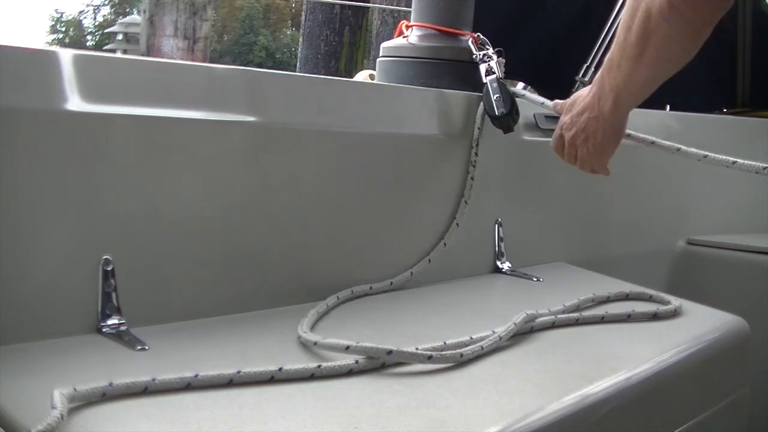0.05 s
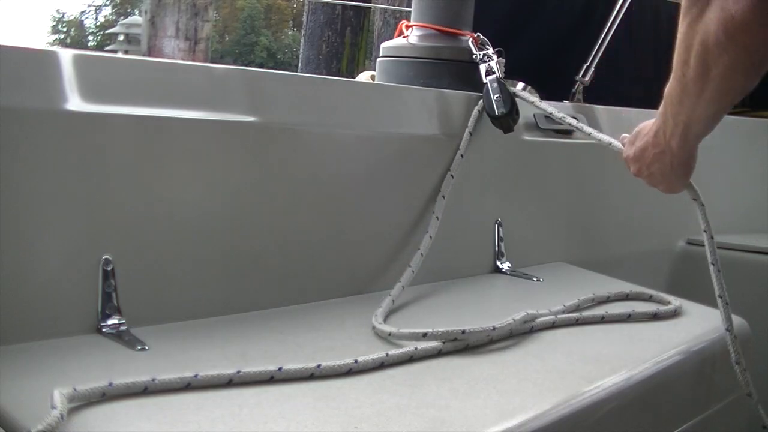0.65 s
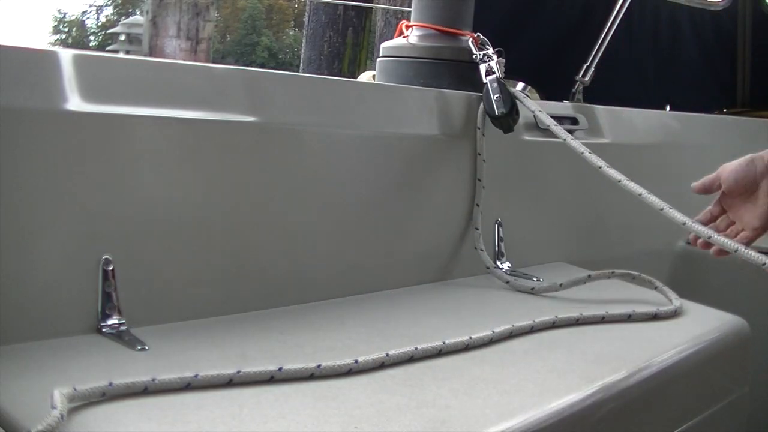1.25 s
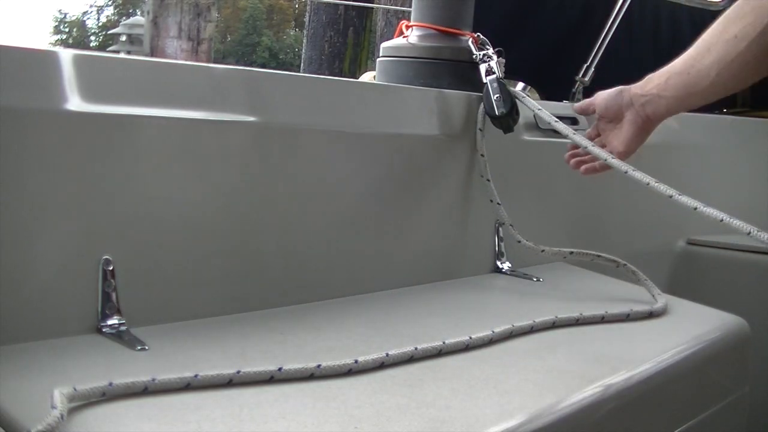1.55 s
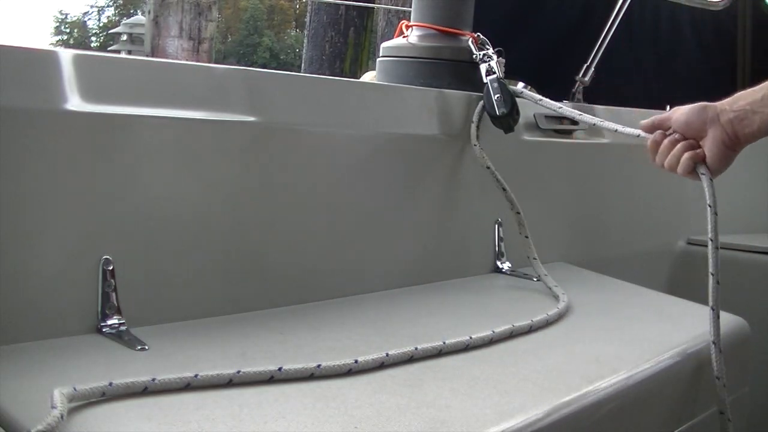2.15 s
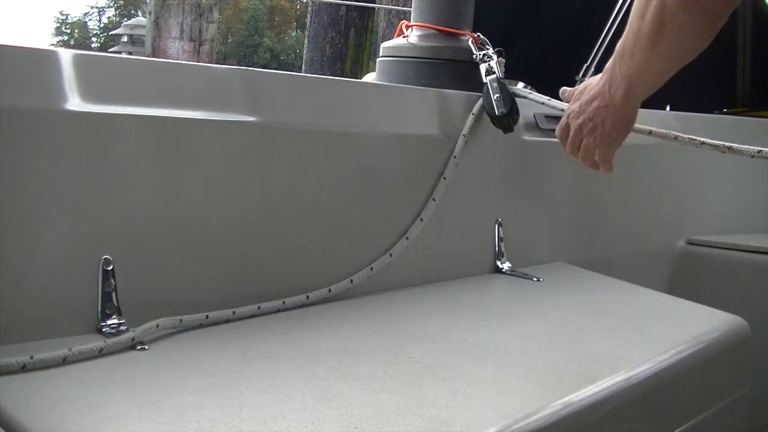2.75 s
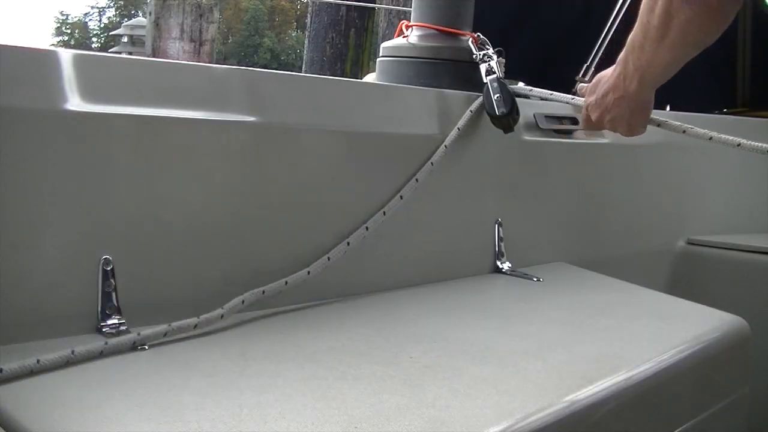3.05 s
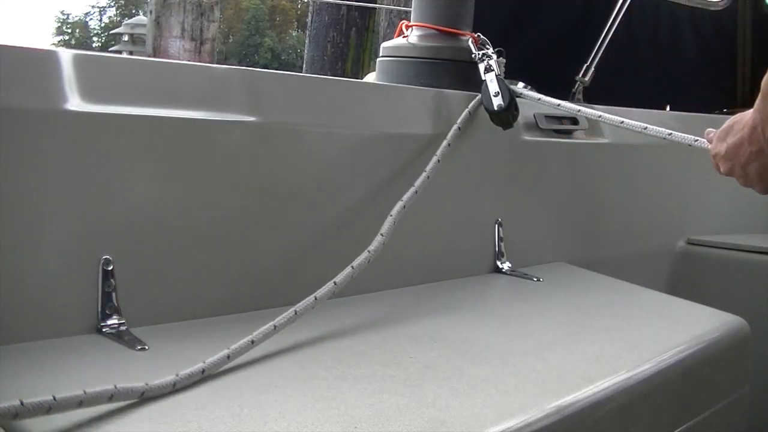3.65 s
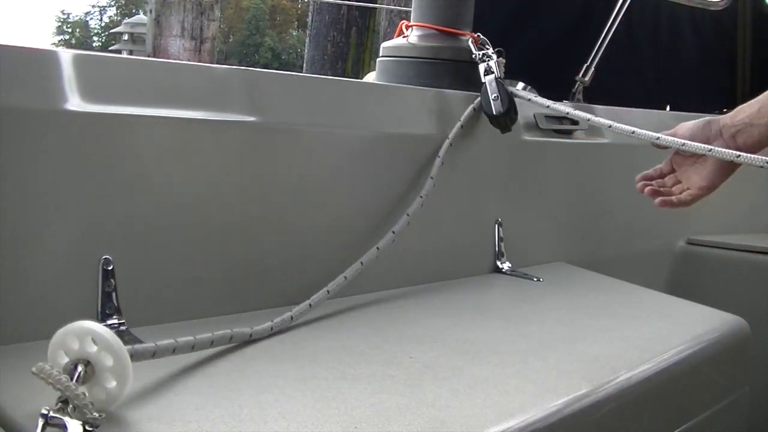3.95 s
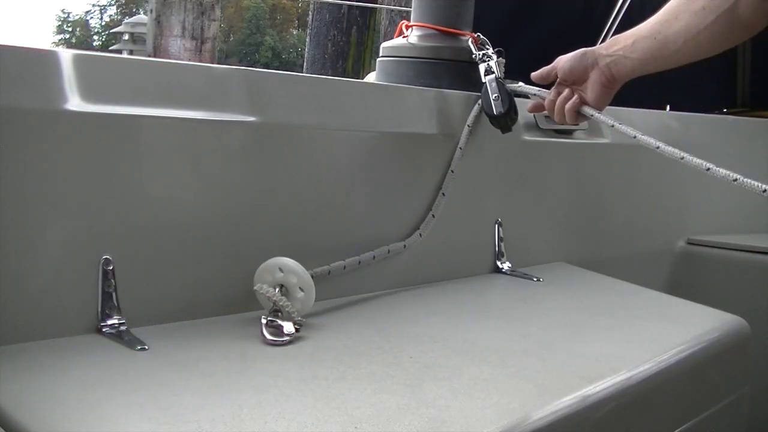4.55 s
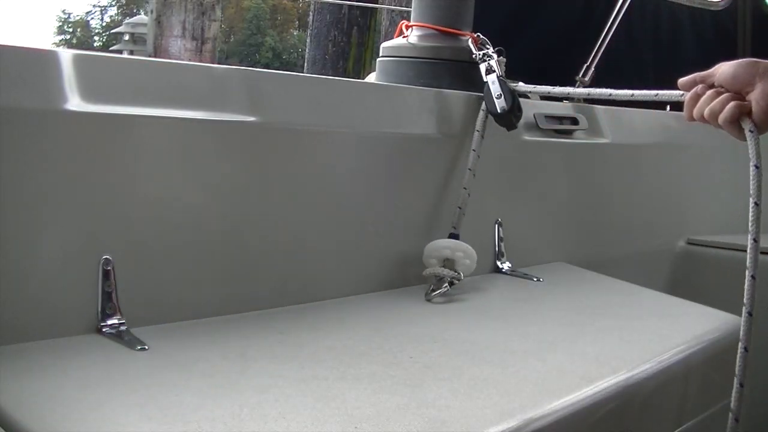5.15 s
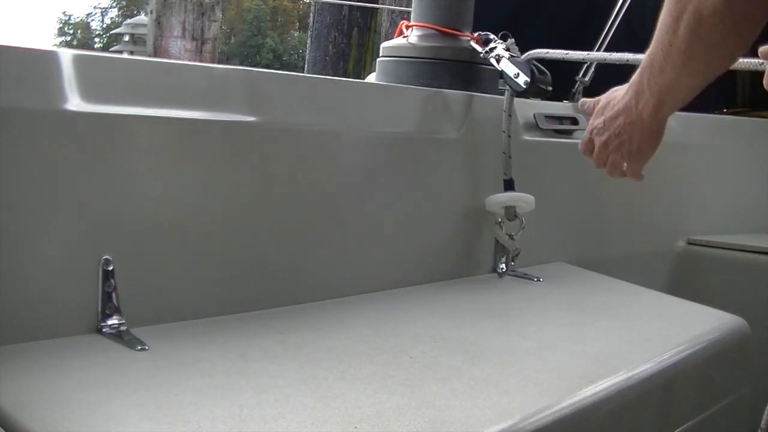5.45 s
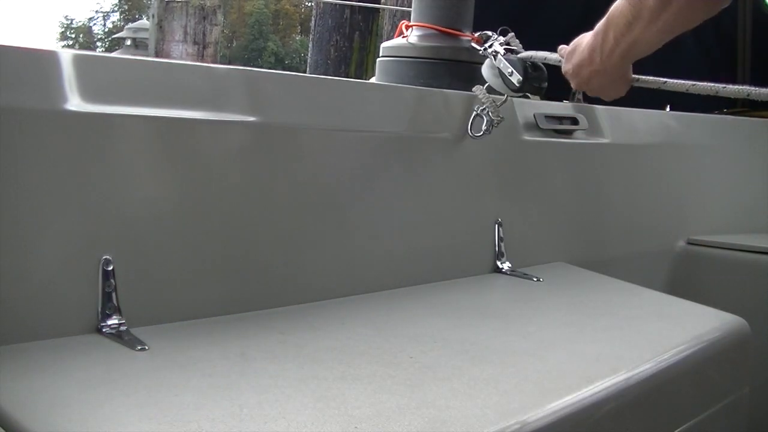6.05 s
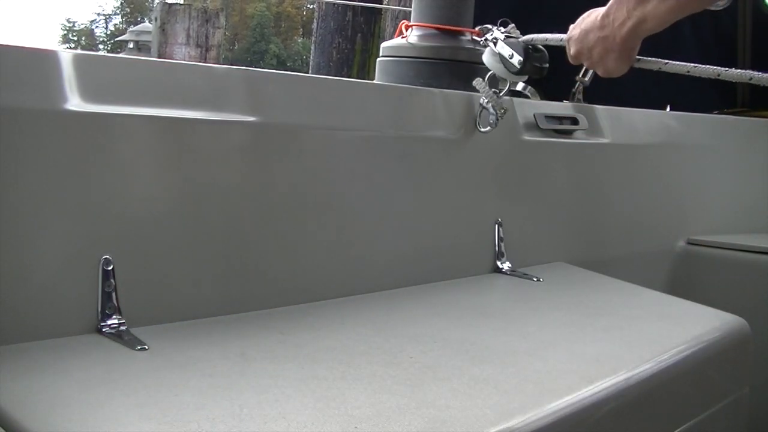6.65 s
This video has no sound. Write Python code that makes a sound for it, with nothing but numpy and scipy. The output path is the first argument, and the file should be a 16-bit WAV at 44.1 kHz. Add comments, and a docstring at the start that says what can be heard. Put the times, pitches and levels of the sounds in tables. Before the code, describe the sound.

Rope is hauled softly through a pulley, then its end fittings scrape and clatter over a hollow seat and clack against the block.

```python
"""Rope hauled through a block

A braided rope runs hand over hand through a block in a sailing boat's cockpit, hissing over the sheave.
The plastic stopper disc and steel shackle on its end drag and chatter across the hollow seat, lift off
and knock against the block four times. The walls give a short, dense echo; wind and water murmur."""
import sys
import numpy as np
from scipy import signal
from scipy.fft import rfft, irfft, next_fast_len
from scipy.io import wavfile
from scipy.ndimage import uniform_filter1d, minimum_filter1d

SR = 44100
rng = np.random.default_rng(int(sys.argv[2]) if len(sys.argv) > 2 else 0)


def file_out(sig):
    """Save sig as 16-bit WAV at sys.argv[1]."""
    # one column per channel
    cols = np.atleast_2d(sig).T
    # limit, then scale
    lim = np.clip(cols, -1, 1)
    pcm = np.round(lim * 32767).astype(np.int16)
    wavfile.write(sys.argv[1], SR, pcm)


N = 299962
T = np.arange(N) / SR
HZ = np.fft.rfftfreq(16384, 1 / SR)

# Hard knocks of the fittings. Each row: start in seconds, level, bass and treble in dB, pitch factor,
# rattle level and rattle treble in dB, rattle length in seconds, crack peak in dB.
KNOCKS = [(3.433, -14.5, 16, 8, 1.1, -12, 12, 0.0098, -30),
          (3.9395, -0.5, 20.5, 17, 0.92, -4.5, -2, 0.0047, -15),
          (4.0506, 2.5, -38, 10, 1.02, -0.5, -8, 0.0064, -12),
          (5.5355, -9, 3.5, -15, 0.96, 0, -34, 0.004, -40), (5.8757, 1, 15, 19, 1.05, 1.5, 18, 0.063, -2),
          (6.0448, -17, -3, 22, 1.3, 7.5, 9, 0.035, -28), (6.0737, 0.5, -5, 7, 0.98, -1, 9, 0.0059, -14),
          (6.4486, -1, -7, 2.5, 0.98, -4, 3, 0.0042, -21.5),
          (6.7364, 1.5, -10, 3.5, 1, -8, 3, 0.017, -15.5)]


def rope():
    """Fibres brush the sheave and whirr with each pull; on a snatch the weave runs fast enough to sing."""
    haul = [(0, -48), (.25, -48), (.56, -47), (2.15, -45.5), (2.8, -43), (3.2, -43), (4.6, -40.5),
            (4.78, -48), (5.1, -32.5), (5.62, -47), (5.8, -43.5), (6.02, -47), (6.18, -44), (6.43, -47.5),
            (6.7, -51)]  # Each row: time in seconds, hiss level in dB.
    braid_spectrum = [(410, -72), (700, -22), (852, -8.5), (1120, -13), (1400, -11.5), (1560, -11),
                      (2490, -4), (3790, -2.5), (4100, -3), (5260, 0.5), (9990, -29.5), (15000, -50)]  # Each row: frequency in Hz, level in dB.
    sheave_modes = [(4140, 61, -26), (4150, 88, -20), (5970, 110, -21)]  # Each row: frequency and width in Hz, dB against the hiss.
    # Each row: start, end, rise and fall in seconds, whirr pitch in Hz, level in dB.
    pulls = [(.42, 1.2, 0.14, 0.19, 5770, -50), (1.29, 2.0, 0.1, 0.24, 5200, -49.5),
             (2.12, 2.55, .14, 0.14, 5500, -50), (5.678, 5.862, 0.12, 0.067, 1950, -42)]
    # One table a snatch. Each row: time in seconds, pitch in Hz, level in dB.
    snatches = [
        [(5.32, 7500, -58), (5.385, 6540, -36.5), (5.42, 6400, -44)],
        [(6.48, 6200, -42), (6.54, 6500, -46), (6.567, 6000, -40.5), (6.595, 5200, -61)],
    ]
    hiss = through(grains(per_s=14000, spread_db=3.5), body(read(braid_spectrum)))
    hiss = hiss + sum(amp(db) * resonate(hiss, hz, width) for hz, width, db in sheave_modes)
    out = hiss * amp(np.interp(T, *np.transpose(haul)) + 0.58 * wander(per_s=30))
    drift = 1 + 0.058 * wander(per_s=8.2)
    for *span, hz, db in pulls:
        out += amp(db) * stroke(*span) * whistle(hz * drift, width_hz=1500)
    for snatch in snatches:
        times, hz, db = np.transpose(snatch)
        pitch_hz = np.interp(T, times, hz)
        gain = amp(np.interp(T, times, db)) * (T >= times[0]) * (T <= times[-1])
        tone = whistle(pitch_hz, width_hz=1400)
        overtone = amp(-15.5) * whistle(1.7 * pitch_hz, width_hz=1400)
        out += gain * (tone + overtone)
    return out


def sheave():
    """The spinning sheave rubs its cheek once a turn with a thin, rough chirp."""
    spins = [(0.618, 1.29, -54), (2.754, 3.1, -51.5)]  # Each row: start and end in seconds, peak in dB.
    chirp_hz, turn_s = 7660, 0.1
    t = T[:SR // 30]
    jitter = 0.13 * np.cumsum(rng.standard_normal(len(t)))
    chirp = np.hanning(len(t)) * np.sin(2 * np.pi * chirp_hz * t + jitter)
    return struck([(s, db) for start, end, db in spins for s in np.arange(start, end, turn_s)], chirp)


def knocks():
    """A sharp blow, then a brief rattle while the parts settle; each contact has its own colour."""
    block_spectrum = [(40, -70), (90, -49), (160, -22.5), (300, -15.5), (800, -8.5), (1300, -7), (2100, 1),
                      (2900, 0.5), (4000, -3), (6000, -9), (7500, -25.5), (11000, -46), (16000, -46)]  # Each row: frequency in Hz, level in dB.
    block_modes = [(1950, 400, 1.5), (2770, 400, 2.5)]  # Each row: frequency and width in Hz, lift in dB.
    dulling = [(8000, 0), (11000, -4), (15000, -10)]  # Softer later contacts. Each row: frequency in Hz, gain in dB.
    out, t = np.zeros(N), T[:len(HZ)]
    bass = 1 / (1 + (HZ / 900) ** 2)
    treble = 1 / (1 + (5500 / (HZ + 1)) ** 3)
    # Bending waves carry treble faster than bass, which smears the blow.
    delay_s = 0.002456 / np.sqrt(1 + HZ / 500)
    blow = irfft(np.exp(-2j * np.pi * np.cumsum(delay_s) * HZ[1]))[:len(t)]
    for start, db, bass_db, treble_db, pitch, rattle_db, rattle_treble_db, rattle_s, _ in KNOCKS:
        colour_db = read(block_spectrum, HZ / pitch) + lifts(block_modes) + bass_db * bass
        hard = body(colour_db + treble_db * treble)
        soft = body(colour_db + rattle_treble_db * treble + read(dulling))
        rattle = unit_energy(rng.standard_normal(len(t)) * np.exp(-(t / rattle_s) ** 2))
        knock = signal.fftconvolve(blow, hard) + amp(rattle_db) * signal.fftconvolve(rattle, soft)
        add(out, start, amp(db) * knock / abs(hard).max())
    return out


def cracks():
    """The thin snap of first contact that opens each knock."""
    spectrum = [(2000, -26), (4000, 14), (5500, 3), (7000, 11), (9000, 6), (13000, -4), (16000, 0)]  # Each row: frequency in Hz, level in dB.
    delay_s, length_s = 0.0004, 0.0016
    t = T[:round(length_s * SR)]
    burst = rng.choice([-1., 1.], len(t)) * np.sin(np.pi * t / length_s)
    crack = signal.fftconvolve(burst, body(read(spectrum)))
    return struck([(start + delay_s, db) for start, *_, db in KNOCKS], crack)


def cheek_clacks():
    """The stopper strikes the block's steel cheek, which rings."""
    clacks = [(6.0452, -11), (6.1838, -27)]  # Each row: start in seconds, peak in dB.
    modes = [(487, -2.5, 0.032), (1280, -2, 0.061), (2420, -7, 0.092), (2690, -4, 0.11), (2700, 4, 0.14),
             (3230, 5, 0.1), (3330, -3, 0.076), (3410, 5, 0.09), (3920, -6, .05), (4960, -2, .05),
             (7450, 2, 0.05), (7860, -12, 0.044)]  # Each row: frequency in Hz, level in dB, t60 in seconds.
    return struck(clacks, ringing(modes))


def scrape_controls():
    """The disc's speed sets the gains of boom, clatter, rasp and grit, and the rim's pitch in Hz."""
    # Each row: start, end, rise and fall in seconds, then at full speed: boom, clatter, rasp and grit
    # in dB, rim pitch in Hz.
    scrapes = [(3.233, 3.891, 0.34, 0.15, -26.5, -28.5, -28, -34, 2130),
               (3.625, 4.046, 0.2, 0.021, -41.5, -34.5, -25, -32.5, 2270),
               (3.98, 4.824, 0.14, 0.24, -30, -31, -20, -31.5, 2430),
               (4.77, 5.091, 0.023, 0.018, -30.5, -34.5, -36.5, -64, 2020),
               (4.873, 5.304, 0.21, 0.069, -35, -33, -17, -33.5, 2750),
               (5.192, 5.506, 0.073, 0.15, -31.5, -29, -19, -35.5, 2170),
               (5.385, 5.556, 0.094, 0.055, -29.5, -23.5, -24, -32.5, 2130)]
    speed_powers = 0.67, 0.96, 1.74, 1.74  # boom, clatter, rasp, grit
    slow_pitch_share = 0.66
    rows = np.array(scrapes)
    speed = np.array([stroke(*row[:4]) for row in rows])
    gains = [amp(db[:, None]) * speed ** power for db, power in zip(rows[:, 4:8].T, speed_powers)]
    pitches_hz = rows[:, 8:] * (slow_pitch_share + (1 - slow_pitch_share) * speed)
    rasp_power = gains[2] ** 2
    pitch_hz = np.average(pitches_hz, axis=0, weights=rasp_power + 1e-12)
    return np.linalg.norm(gains, axis=1), pitch_hz


def drag():
    """The disc bumps over non-slip grain: the same impacts drum the seat, rasp the rim and crackle."""
    # Bare rope on the seat. Each row: start, end, rise and fall in seconds, level in dB.
    slides = [(2.636, 2.922, 0.015, 0.045, -54.5), (2.883, 3.077, 0.01, 0.13, -45.5),
              (3.077, 3.234, 0.023, 0.13, -48)]
    clatter_spectrum = [(60, -57), (250, -22.5), (430, 14), (540, 10.5), (800, 9), (1100, 2.5), (1400, 2.5),
                        (2200, -40.5)]  # Each row: frequency in Hz, level in dB.
    grit_spectrum = [(2500, -19.5), (4300, 4.5), (5200, 13.5), (6300, 8), (7500, -4.5), (9500, -7.5),
                     (11000, -13), (14000, -18), (16000, -81)]  # Each row: frequency in Hz, level in dB.
    (boom_gain, clatter_gain, rasp_gain, grit_gain), pitch_hz = scrape_controls()
    slide_gain = sum(amp(db) * stroke(*span) for *span, db in slides)
    bumps = grains(per_s=7000, spread_db=1)
    bumps = unit_rms(bumps * amp(0.9 * wander(per_s=120)))  # uneven pressure
    boom = (boom_gain + slide_gain) * seat_boom(bumps)
    clatter = clatter_gain * through(bumps, body(read(clatter_spectrum)))
    rasp = rasp_gain * rim_rasp(bumps, pitch_hz)
    grit = grit_gain * through(bumps, body(read(grit_spectrum)))
    return boom + clatter + rasp + grit


def seat_boom(bumps):
    """The hollow seat's modes trade strength as the disc travels inward from the free edge."""
    spectrum = [(40, -66), (70, -35), (100, -4), (130, -9.5), (170, -2), (260, 1.5), (350, -4), (480, 9.5),
                (900, -12.5), (2000, -72)]  # Each row: frequency in Hz, level in dB.
    modes = [(107, 14, -5, 6), (167, 14, 4, 2), (202, 24, 2, 2), (245, 45, -3, 4), (281, 22, 11, 4),
             (337, 22, 11, 10), (405, 40, -5, 0), (508, 30, 8, -3), (615, 22, -2, 4), (810, 90, 10, 8),
             (955, 45, 9, 5)]  # Each row: frequency and width in Hz, edge and mid-seat weights in dB.
    edge_nearness = [(3.8, 0.96), (4.0, 0.08)]  # Each row: time in seconds, nearness from 0 to 1.
    near = np.interp(T, *np.transpose(edge_nearness))
    panel = sum(amp(near * edge_db + (1.5 - near) * mid_db) * resonate(bumps, hz, width)
                for hz, width, edge_db, mid_db in modes)
    wash = through(bumps, body(read(spectrum)))
    return amp(-3) * unit_rms(tinted(panel, spectrum)) + amp(-4) * wash


def rim_rasp(bumps, pitch_hz):
    """The rim's hollow ring drifts as the disc turns onto another contact point."""
    spectrum = [(100, -71), (600, -25), (1150, -8), (1450, -3.5), (2000, -1.5), (2700, -1), (3500, -2.5),
                (4500, -6.5), (6000, -8), (8000, -59)]  # Each row: frequency in Hz, level in dB.
    modes = [(1410, 70, 4), (1870, 90, 3), (2450, 150, 2), (2780, 260, 2.5)]  # Each row: frequency and width in Hz, lift in dB.
    rim_rings = [(0.562, 60, -46), (.86, 169, 4.5), (1, 220, 10.5), (1.14, 190, -2)]  # Each row: multiple of the pitch, width in Hz, level in dB.
    disc = through(bumps, body(read(spectrum) + lifts(modes)))
    rings = sum(amp(db) * resonate(disc, pitch_hz * (ratio + 0.081 * wander(per_s=10)), width)
                for ratio, width, db in rim_rings)
    return unit_rms(resonate(disc, pitch_hz, width_hz=2200) + amp(-4) * unit_rms(rings))


def disc_skips():
    """Stick and slip: the rim snaps free with clicks that ring the disc briefly."""
    skips = [(3.5435, -7), (3.6246, -13), (3.6461, -12), (3.6558, -10), (3.7021, -7), (3.7164, -8),
             (3.7332, -3), (3.7449, -6), (3.757, -10), (3.7685, -10), (3.7748, -7), (3.7843, -5),
             (3.7949, -3), (3.8071, -4), (3.8173, -7), (3.8288, -6), (3.8458, -3), (3.8602, -4),
             (3.8722, -4), (3.8817, -3), (3.9043, -8), (3.9642, -9), (4.0107, -5), (4.1059, -8),
             (4.4542, -8), (4.5, -6), (4.5327, -8), (4.6598, -12), (4.8971, -10), (5.1489, -6),
             (5.1912, -5), (5.3578, -7)]  # Each row: start in seconds, peak in dB.
    spectrum = [(200, -27), (1100, -16), (1800, 16.5), (3000, 14), (4500, 5.5), (6500, -8.5), (9000, -11),
                (16000, -57)]  # Each row: frequency in Hz, level in dB.
    modes = [(1720, 72, 0.5), (2800, 490, 2)]  # Each row: frequency and width in Hz, lift in dB.
    return struck(skips, body(read(spectrum) + lifts(modes)))


def disc_sings():
    """Rubbing wakes one mode of the disc, then another, as it tilts."""
    sings = [(3.795, 3.98, 1780, -28), (3.67, 3.816, 2580, -26), (4.1, 4.198, 2260, -15),
             (4.25, 4.413, 2790, -24.5), (4.276, 4.477, 1420, -31.5), (4.83, 4.95, 1980, -28.5),
             (5.247, 5.354, 2530, -21)]  # Each row: start and end in seconds, pitch in Hz, level in dB.
    fade_s = 0.057
    return sum(amp(db) * stroke(start, end, fade_s, fade_s) * whistle(hz, width_hz=260)
               for start, end, hz, db in sings)


def shackle():
    """Steel pin and bow tick together; which mode rings most changes as the shackle tumbles."""
    modes = [(6240, -7, .12), (8830, -10, .05), (9140, 1, .13), (9260, -4, .09), (9490, -11, .05),
             (12450, -5, .18), (14120, -12, .1)]  # Each row: frequency in Hz, level in dB, t60 in seconds.
    tick_spectrum = [(3000, -7), (6500, 10.5), (9200, -1.5), (11000, 1), (14000, -21), (16000, -19)]  # Each row: frequency in Hz, level in dB.
    # Each row: start, end, rise and fall in seconds, relative level in dB, outer-mode offset in dB.
    jingles = [(3.29, 3.452, 0.031, .03, -39.5, -8), (3.427, 3.543, 0.023, 0.04, -30.5, -3),
               (3.515, 3.66, 0.031, 0.093, -24.5, 9), (3.596, 3.95, 0.071, 0.11, -28, -1),
               (3.89, 4.257, 0.059, 0.047, -31, 1), (4.21, 4.504, .05, 0.047, -36, 3),
               (4.444, 4.758, .05, 0.06, -39.5, -2)]
    # Single blows. Each row: start in seconds, peak in dB, share of t60, outer-mode offset in dB.
    chinks = [(3.325, -34, 0.23, -14), (3.358, -29, 0.2, -2), (3.433, -22, 0.7, -5),
              (3.474, -20.5, 0.61, -4), (3.531, -19.5, 0.44, 7), (3.696, -19, 1, -7),
              (3.744, -20, 0.7, -16), (4.051, -18, 0.21, -13), (4.16, -36, .5, -12), (4.392, -25, 0.44, -6),
              (5.537, -19.5, 0.59, -34)]
    main_hz, flicker_db, lying_t60_share = 9200, 7, 0.16  # lying on the seat damps the ring
    outer = [abs(hz - main_hz) > 500 for hz, _, _ in modes]
    main_gain = sum(amp(db) * stroke(*span) for *span, db, _ in jingles)
    outer_gain = sum(amp(db + outer_db) * stroke(*span) for *span, db, outer_db in jingles)
    ticks = grains(per_s=380, spread_db=2.6) * amp(4 * wander(per_s=60))
    out = amp(-7) * through(ticks * main_gain, body(read(tick_spectrum)))
    for (hz, db, t60), is_outer in zip(modes, outer):
        ring = unit_energy(ringing([(hz, db, t60 * lying_t60_share)]))
        contact = amp(db + flicker_db * np.tanh(wander(per_s=32)))
        out += amp(-19) * through(ticks * contact * (outer_gain if is_outer else main_gain), ring)
    for start, peak_db, share, outer_db in chinks:
        chink_modes = [(hz, db + outer_db * is_outer, t60 * share)
                       for (hz, db, t60), is_outer in zip(modes, outer)]
        add(out, start, amp(peak_db) * ringing(chink_modes))
    return out


def taps():
    """Slack rope slaps the seat and gear shifts: soft, smeared contacts."""
    contacts = [(0.846, -34, 220, 0.39), (.856, -31, 2500, 1.1), (0.947, -27.5, 3730, 0.27),
                (1.3033, -38, 1410, 0.085), (1.966, -35, 2940, 0.46), (2.457, -36.5, 255, 0.36),
                (2.9001, -26.5, 287, 0.42), (2.936, -32.5, 378, 0.77), (3.24, -31.5, 268, 0.48),
                (4.062, -14.5, 4800, 0.035), (4.08, -18, 2640, .04), (4.1, -13.5, 4200, 0.16),
                (4.8969, -14, 2030, 0.24)]  # Each row: start in seconds, peak in dB, centre in Hz, spread in octaves.
    out, t = np.zeros(N), T[:len(HZ)]
    treble_loss_db = HZ / 700  # soft contact
    bass_loss_db = 20 * np.log10(1 + (85 / (HZ + 10)) ** 2)  # panels radiate little deep bass
    for start, db, hz, octaves in contacts:
        band_db = -8 * np.log1p((np.log2((HZ + 1) / hz) / octaves) ** 2)
        force = rng.standard_normal(len(t)) * np.exp(-t / 0.0083)
        tap = signal.fftconvolve(force, body(band_db - treble_loss_db - bass_loss_db))
        add(out, start, amp(db) * tap / abs(tap).max())
    return out


def cockpit():
    """Impulse response of the close fibreglass walls; each band dies at its own rate."""
    decay = [(100, 0.56), (500, 0.2), (2500, 0.15), (6000, 0.13), (14000, 0.25)]  # Each row: frequency in Hz, t60 in seconds.
    size, per_s, first_s = SR // 3, 14000, 0.0012
    reflections = rng.choice([-1., 1.], size) * (rng.random(size) < per_s / SR) * (T[:size] > first_s)
    hz, t, bands = signal.stft(reflections, SR, nperseg=128)
    _, tail = signal.istft(bands * amp(-60 * t / read(decay, hz)[:, None]), SR, nperseg=128)
    return unit_energy(tail)


def shifting_echo(x, count=5, shift_s=0.22):
    """The gear moves, so one pattern of reflections fades into the next."""
    out = np.zeros(N)
    for k in range(count):
        away = (T / shift_s - k + count / 2) % count - count / 2
        out += through(x * np.cos(np.pi / 2 * np.clip(away, -1, 1)), cockpit())
    return out


def air():
    """Distant murmur of wind and water, gently swelling."""
    spectrum = [(20, -60), (55, -12.5), (110, -5.5), (200, 2.5), (320, 2), (520, -7), (1000, -17),
                (2500, -12), (5500, -19.5), (8000, -20), (14000, -29), (16000, -42)]  # Each row: frequency in Hz, level in dB.
    gain = amp(-53 + 0.6 * wander(per_s=6))
    return gain * through(rng.standard_normal(N), body(read(spectrum)))


def amp(db):
    """Decibels to gain."""
    return 10 ** (np.asarray(db) / 20)


def unit_rms(x):
    """Scales to rms 1."""
    return x / np.sqrt(np.mean(x ** 2) + 1e-20)


def unit_energy(x):
    """Scales to energy 1."""
    return x / np.linalg.norm(x)


def read(points, hz=HZ):
    """Interpolates on a log-frequency axis."""
    knots_hz, values = np.transpose(points)
    return np.interp(np.log(hz + 1), np.log(knots_hz + 1), values)


def lifts(modes):
    """Resonances as bumps on a dB spectrum."""
    return sum(db / (1 + (2 * (HZ - hz) / width) ** 2) for hz, width, db in modes)


def body(db):
    """Minimum-phase impulse response with this dB spectrum, energy 1."""
    log_gain = np.log(amp(np.maximum(db, db.max() - 90)))
    mirrored = np.concatenate([log_gain, log_gain[-2:0:-1]])
    spectrum = np.exp(signal.hilbert(mirrored).conj())
    return unit_energy(np.fft.ifft(spectrum).real[:len(HZ)])


def through(x, response):
    """Plays a force into a body."""
    return signal.oaconvolve(x, response)[:N]


def tinted(x, db_points):
    """Applies a smooth dB spectrum."""
    size = next_fast_len(N + 2048, True)
    gain = amp(read(db_points, np.fft.rfftfreq(size, 1 / SR)))
    return irfft(rfft(x, size) * gain, size)[:N]


def add(mix, start_s, sound):
    """Adds a sound in place."""
    part = mix[round(start_s * SR):][:len(sound)]
    part += sound[:len(part)]


def struck(rows, sound):
    """One sound at each (start in seconds, peak in dB)."""
    out = np.zeros(N)
    for start, db in rows:
        add(out, start, amp(db) * sound / abs(sound).max())
    return out


def stroke(start_s, end_s, rise_s, fall_s):
    """Speed of one movement, 0-1: it rises, holds and falls."""
    return np.clip(np.minimum((T - start_s) / rise_s, (end_s - T) / fall_s), 0, 1)


def wander(per_s):
    """Smooth random curve, rms 1."""
    knots = rng.standard_normal(N // 20)
    return unit_rms(np.interp(T * per_s, np.arange(len(knots)), knots))


def grains(per_s, spread_db):
    """Random tiny impacts of uneven size, rms 1."""
    size = amp(spread_db * np.minimum(rng.exponential(1, N), 4)) * rng.choice([-1, 1], N)
    return unit_rms(size * (rng.random(N) < per_s / SR))


def resonate(x, hz, width_hz):
    """A resonance at hz (number or curve), rms 1."""
    carrier = np.exp(2j * np.pi * np.cumsum(np.full(N, hz)) / SR)
    pole = np.exp(-np.pi * width_hz / SR)
    return unit_rms((carrier * signal.lfilter([1 - pole], [1, -pole], x / carrier)).real)


def whistle(hz, width_hz):
    """Friction noise in a steep resonance at hz (number or curve), rms 1."""
    carrier = np.exp(2j * np.pi * np.cumsum(np.full(N, hz)) / SR)
    pole = np.exp(-np.pi * width_hz / SR)
    baseband = signal.lfilter([1], [1, -2 * pole, pole * pole], rng.standard_normal(N) / carrier)
    return unit_rms((carrier * baseband).real)


def ringing(modes, attack_s=0.00023):
    """Dying sines of struck metal, peak 1."""
    t = T[:len(HZ)]
    ring = sum(amp(db - 60 * t / t60) * np.sin(2 * np.pi * hz * t) for hz, db, t60 in modes)
    ring *= np.minimum(t / attack_s, 1)
    return ring / abs(ring).max()


def scene():
    """Direct sound and cockpit echo in stereo, widest in the treble."""
    side_spectrum = [(30, -14), (70, -25), (300, -29), (700, -31), (1400, -26), (3000, -19), (5500, -14),
                     (8000, -5), (9200, 0), (14000, 1)]  # Each row: frequency in Hz, side gain in dB.
    balance = [(2400, 0), (5000, -.3), (7500, -1), (9200, -8), (10500, 2), (12400, -3), (14200, 0)]  # Each row: frequency in Hz, left minus right in dB.
    gear = rope() + sheave() + drag() + disc_sings() + shackle() + taps() + cheek_clacks()
    hits, clicks = knocks(), disc_skips()
    direct = gear + hits + cracks() + clicks + air()
    echo_send = amp(-6) * gear + amp(5) * hits + amp(-7.5) * clicks
    mid = direct + shifting_echo(echo_send)
    side = tinted(through(amp(2.5) * echo_send + air(), cockpit()), side_spectrum)
    side += amp(-16.5) * air()
    left = tinted(mid + side, np.array(balance) * [1, 0.5])
    right = tinted(mid - side, np.array(balance) * [1, -0.5])
    return np.array([left, right])


def record(dry):
    """Fast peak limiter, then a low-pass."""
    ceiling, window_samples, cutoff_hz = 0.97, 91, 15800
    gain = np.minimum(1, ceiling / (abs(dry).max(axis=0) + 1e-9))
    gain = uniform_filter1d(minimum_filter1d(gain, window_samples), window_samples)
    lowpass = signal.firwin(255, cutoff_hz, window=("kaiser", 9), fs=SR)
    return signal.oaconvolve(dry * gain, lowpass[None], "same")


dry = scene()
out = record(dry)
file_out(out)
```